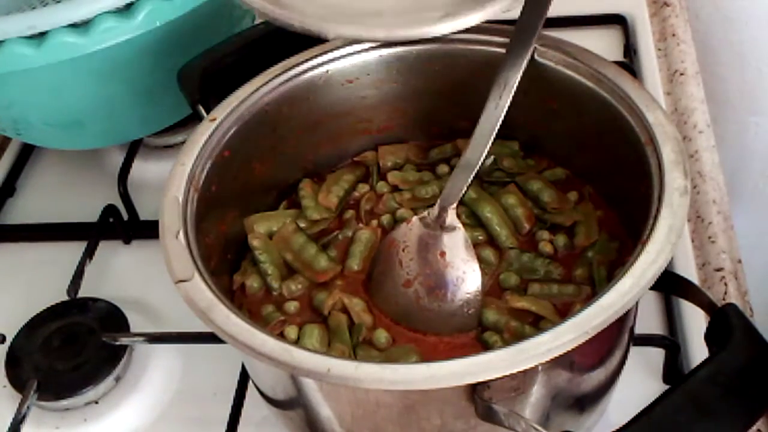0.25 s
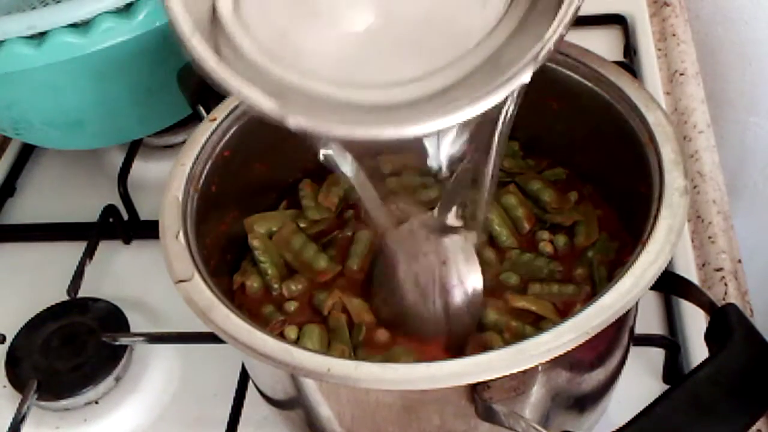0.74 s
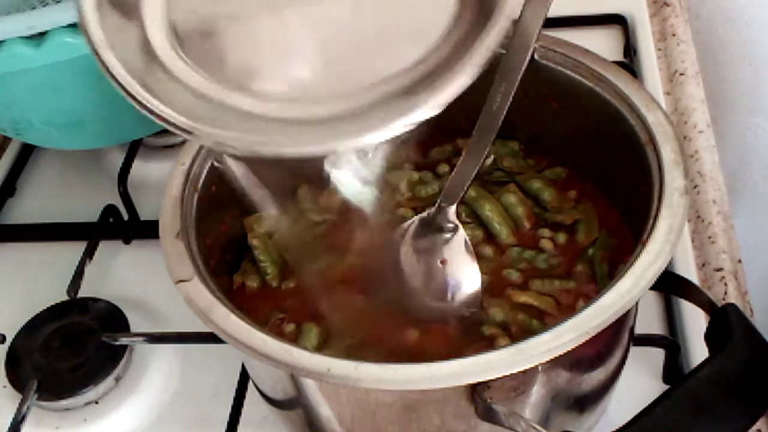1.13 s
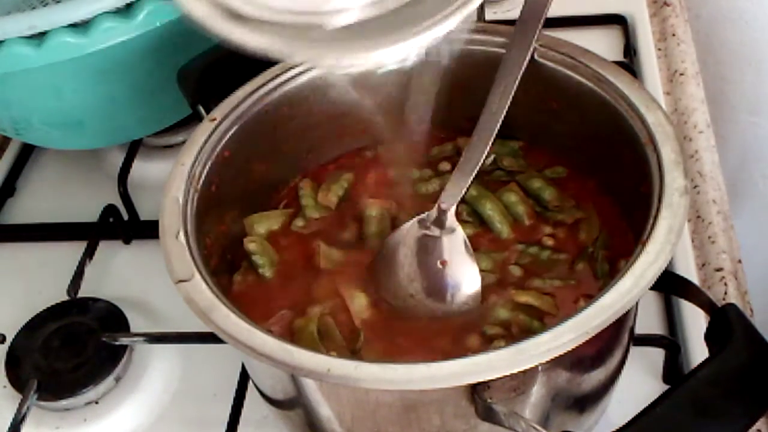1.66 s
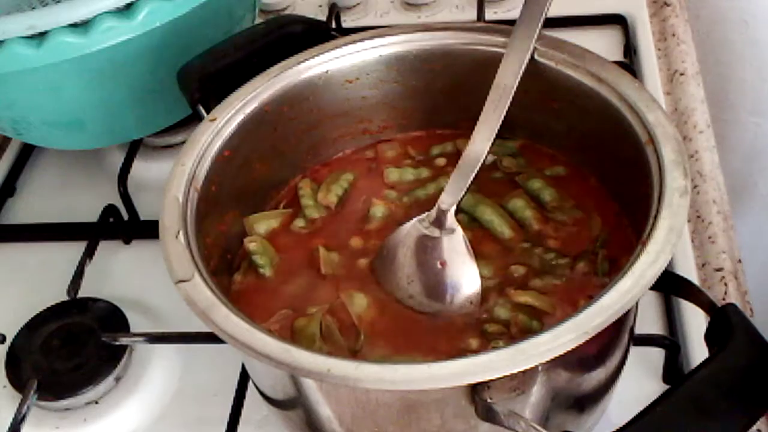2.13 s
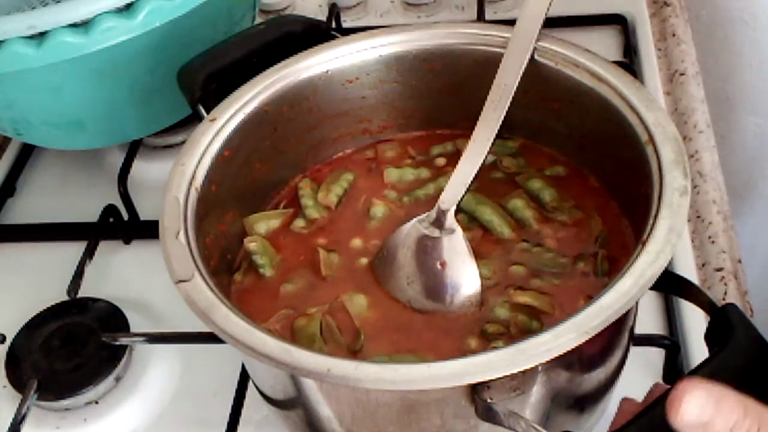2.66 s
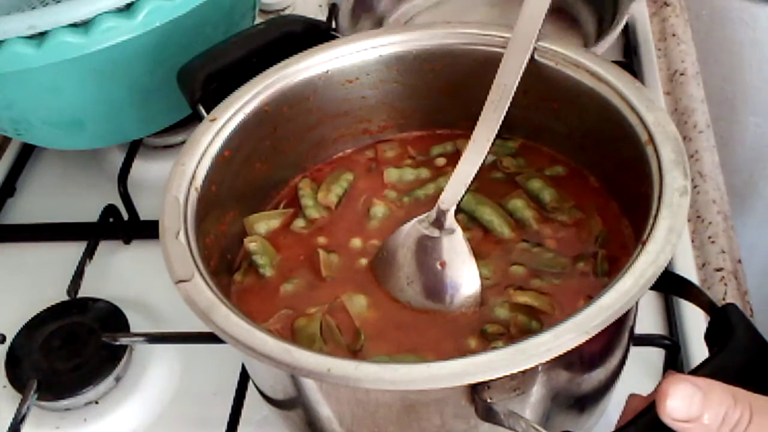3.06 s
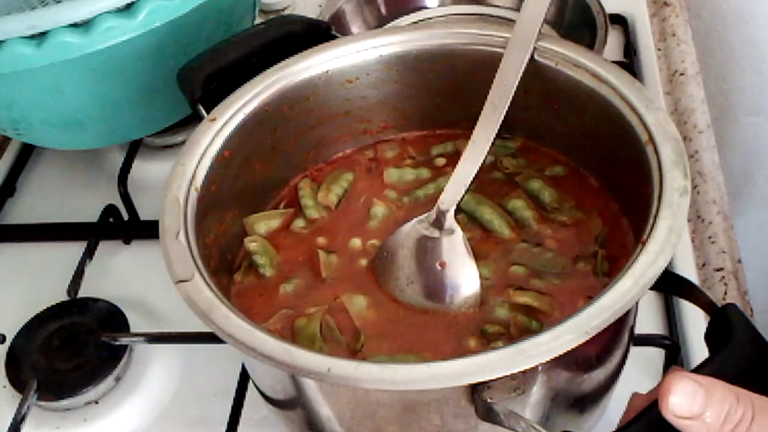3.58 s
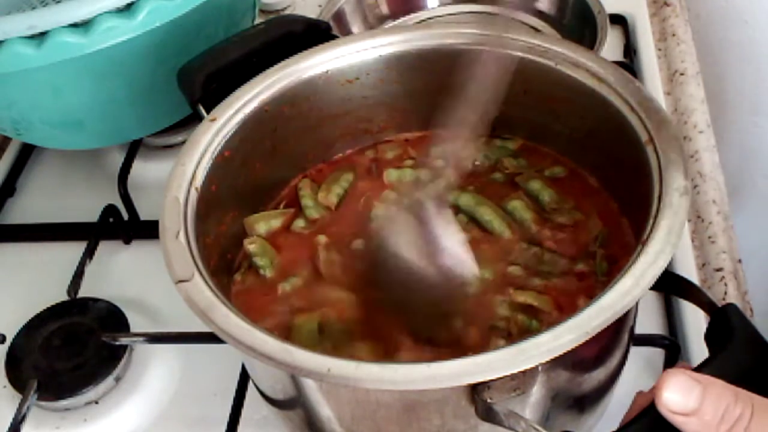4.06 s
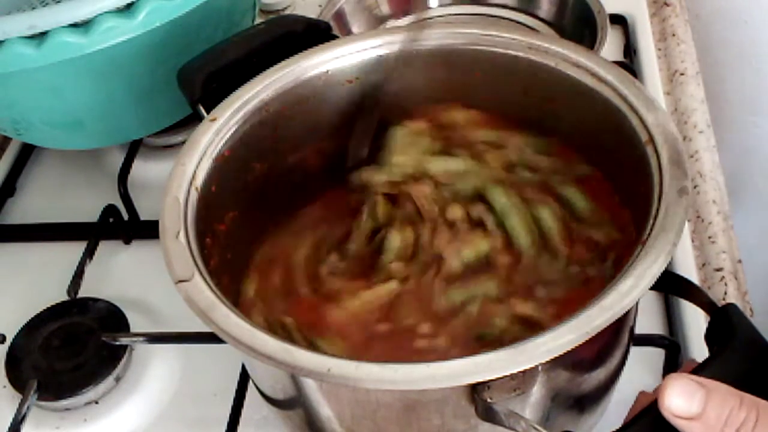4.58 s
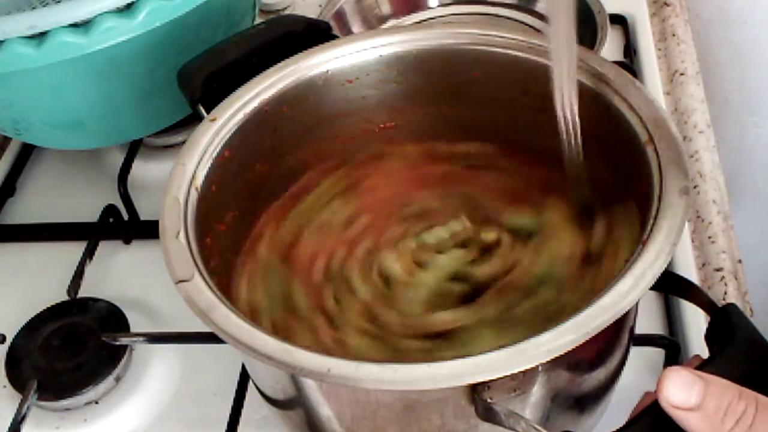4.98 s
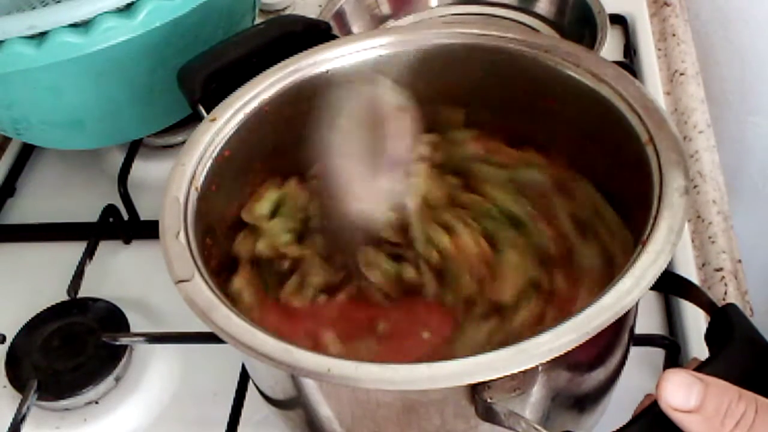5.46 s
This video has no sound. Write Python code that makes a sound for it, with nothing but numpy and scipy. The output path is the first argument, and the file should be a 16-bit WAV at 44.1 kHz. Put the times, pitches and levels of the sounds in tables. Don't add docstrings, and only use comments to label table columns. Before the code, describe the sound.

Close-up cooking sounds on a small, slightly thin microphone: a one-second splashy pour into thick stew, a few faint drips, a hard ringing bang of sheet steel on the stove, a gritty drag with rocking chinks, then one hard ladle knock and quick wet scraping swirls that fade. Steady burner and fan hum underneath, short room reflections.

```python
import sys
import numpy as np
from scipy import signal
from scipy.fft import rfft, irfft, next_fast_len
from scipy.io import wavfile
from scipy.ndimage import uniform_filter1d, map_coordinates

SR = 44100
rng = np.random.default_rng(int(sys.argv[2]) if len(sys.argv) > 2 else 0)


def wav_record(signal):
    frames = np.transpose(np.atleast_2d(signal))
    bounded = np.clip(frames, -1, 1)
    quanta = np.round(bounded * 32767).astype(np.int16)
    wavfile.write(sys.argv[1], SR, quanta)


def volts_from_db(level):
    exponent = np.asarray(level, float) / 20
    return 10 ** exponent


N = 251811
T = np.arange(N) / SR
F = np.maximum(np.fft.rfftfreq(next_fast_len(N), 1 / SR), 1)


def rms_one(x):
    return x / np.sqrt(np.mean(x ** 2) + 1e-20)


def in_time(rows):
    s, *columns = np.transpose(rows)
    return [np.interp(T, s, c, left=-150, right=-150) for c in columns]


def at_hz(points, hz, order=1):
    points = np.array(points)
    return np.interp(np.log(hz), np.log(points[:, 0]), points[:, order])


def colour(x, spectrum):
    size = next_fast_len(N)
    return rms_one(irfft(rfft(x, size) * volts_from_db(at_hz(spectrum, F)), size)[:N])


def drift(rate):
    steps = rng.standard_normal(600)
    coarse = map_coordinates(steps, [T[::32] * rate], order=3, mode="wrap")
    return np.interp(T, T[::32], coarse)


def grains(per_s, spread_db):
    sizes = volts_from_db(spread_db * np.minimum(rng.exponential(1, N), 3.5)) * rng.choice([-1, 1], N)
    return sizes * (rng.random(N) < per_s / SR)


def ring(clicks, hz, t60):
    r, w = volts_from_db(-60 / (t60 * SR)), 2 * np.pi * hz / SR
    return signal.lfilter([0, np.sin(w)], [1, -2 * r * np.cos(w), r * r], clicks + 1e-18)


def add(out, s, sound):
    i = round(s * SR)
    out[i:i + len(sound)] += sound[:N - i]


def soft_start(t, rise_s):
    return 1 - np.exp(-t / rise_s)


def resonance(x, hz, width_hz):
    r, w = np.exp(-np.pi * width_hz / SR), 2 * np.pi * hz / SR
    return signal.lfilter([1 - r * r, 0, r * r - 1], [2, -4 * r * np.cos(w), 2 * r * r], x)


def steep_resonance(x, hz, width_hz):
    return resonance(resonance(x, hz, width_hz), hz, width_hz)


def humps(x, peaks, patchy_db, rate):
    return rms_one(sum(volts_from_db(db + patchy_db * drift(rate)) * steep_resonance(x, hz, w) for hz, w, db in peaks))


def gliding(x, rows, width_hz):
    slow = signal.sosfilt(signal.butter(2, width_hz / 2, fs=SR, output="sos"), x)
    hz = np.interp(T, *np.transpose(rows))
    return rms_one(slow * np.sin(2 * np.pi * np.cumsum(hz) / SR))


def gestures(rows, rise_db_per_s, fall_db_per_s):
    t, out = T[::16], -150
    for s, length, start_db, end_db in rows:
        hold = np.interp(t, [s, s + length], [start_db, end_db])
        before = rise_db_per_s * np.maximum(s - t, 0)
        after = fall_db_per_s * np.maximum(t - s - length, 0)
        out = np.maximum(out, hold - before - after)
    return np.interp(T, t, out)


def strike(modes, level_db, cut_hz, spread_db):
    t, out = T[:SR * 3 // 4], 0
    luck = rng.normal(0, spread_db, len(modes))
    for (hz, db, t60), own in zip(modes, luck):
        gain = volts_from_db(level_db + db + own) / (1 + (hz / cut_hz) ** 4)
        out = out + gain * np.sin(2 * np.pi * hz * t) * volts_from_db(-60 * t / t60)
    return out


def bubbles(rows, t60_at, rise, tick_db, wobble=0.47):
    out, t = np.zeros(N), T[:SR // 5]
    ticks = rng.standard_normal((len(rows), len(t)))
    for (s, db, hz), tick in zip(rows, ticks):
        t60 = max(t60_at(hz), .004)
        octaves = rise * np.minimum(t / t60, 1) + wobble * uniform_filter1d(tick, size=90)
        phase = 2 * np.pi * np.cumsum(hz * 2 ** octaves) / SR
        fizz = steep_resonance(tick * np.exp(-t / .009), 1.1 * hz, .4 * hz)
        body = np.sin(phase) * volts_from_db(-60 * t / t60) + volts_from_db(tick_db) * fizz / np.max(np.abs(fizz))
        add(out, s, volts_from_db(db) * body * soft_start(t, 0.00082))
    return out


def kitchen(x, wet_db):
    t = T[:SR // 2]
    noise = signal.lfilter([.5], [1, -.5], rng.standard_normal(len(t)))
    tail = noise * volts_from_db(-60 * t / 0.38) * (t > .004)
    return x + volts_from_db(wet_db) * signal.fftconvolve(x, tail / np.sqrt(np.sum(tail ** 2)))[:N]


# time in seconds, level in dB.
ROAR_LEVEL = [(0, -88.5), (.7, -80), (.95, -71.5), (1.25, -75), (1.45, -79), (1.6, -94), (1.95, -71),
              (2.35, -81.5), (2.75, -81), (2.98, -71.5), (4.1, -87.5), (4.33, -78.5), (4.45, -91),
              (5.3, -72), (5.47, -70.5), (5.71, -86)]
# pitch in Hz, width in Hz, level in dB.
ROAR_PEAKS = [(569.6, 77, 0), (628, 60, 2), (682.4, 35, 0), (199, 42, -5)]


def roar():
    level_db, = in_time(ROAR_LEVEL)
    return volts_from_db(level_db) * humps(rng.standard_normal(N), ROAR_PEAKS, patchy_db=1.5, rate=7.2)


# pitch in Hz, level in dB per Hz.
HUM_COLOUR = [(25, 3.5), (50, -11.5), (120, -12), (300, -11.5), (700, -17), (1500, -17), (2200, -26),
              (5000, -29.5), (6500, -38.5), (10000, -30.5), (16000, -26)]
# pitch in Hz, width in Hz, level in dB.
HUM_PEAKS = [(106.8, 29, -2.5), (260.5, 13.5, -4), (316.8, 15.7, 5), (340.8, 22.5, 3), (593, 120, -10),
             (1281, 120, -3.5), (1510, 100, -4.5), (2346, 100, -28.5), (3230, 69, -14), (4200, 290, -14.5),
             (5336, 280, -18.5), (7170, 200, -27.5)]
# time in seconds, level in dB.
HUM_LEVEL = [(0, -62.5), (.7, -63), (1.1, -60), (1.5, -62.5), (2.5, -63), (3.0, -63), (4.0, -61),
             (4.3, -64), (5.0, -62.5), (5.3, -62), (5.71, -63.5)]


def hum():
    level_db, = in_time(HUM_LEVEL)
    wide = colour(rng.standard_normal(N), HUM_COLOUR)
    air = rng.standard_normal(N)
    steady = humps(air, HUM_PEAKS[:4], patchy_db=1, rate=3)
    restless = humps(air, HUM_PEAKS[4:], patchy_db=2, rate=4)
    motor = volts_from_db(2.6 * drift(2.7)) * np.sin(200 * np.pi * T)
    both = .5 * wide + 0.52 * (0.69 * steady + 0.59 * restless + 0.17 * motor)
    low = signal.sosfilt(signal.butter(1, 400, fs=SR, output="sos"), both)
    flame = roar()
    flutter = volts_from_db(-0.5 * drift(3.8)) - 1
    return flame + volts_from_db(level_db) * (both + flutter * low)


# start in seconds, peak level in dB, pitch in Hz.
GULPS = [
    (1, -44.5, 1200),
    (0.74, -56, 1440),
    (1.3, -44, 1270),
    (.96, -45, 1300),
    (1.4, -54, 870),
    (1.066, -44.5, 1540),
    (0.72, -63, 1000),
    (1.21, -43, 4330),
    (1.255, -43.5, 1760),
]


def gulps():
    return bubbles(GULPS, lambda hz: 0.011, rise=0.093, tick_db=-14)


# start in seconds, peak level in dB, pitch in Hz.
SPRAY_TICKS = [(0.7736, -49, 14300), (0.9123, -41, 12300), (0.9394, -59, 8450), (0.976, -55, 8400),
               (1.2017, -62, 8800), (1.3733, -55, 10400), (1.486, -59, 10400), (1.6801, -55, 9800),
               (1.748, -43, 8150), (1.8731, -53, 8800), (1.97, -53, 9900), (2.0144, -57, 13500),
               (2.153, -52, 13700), (5.2344, -53, 10140), (5.5797, -60, 13100), (1.479, -62, 8650),
               (1.533, -64, 12000), (1.594, -64, 11700), (1.815, -53, 8600), (1.911, -61, 10500),
               (1.933, -62, 13000), (1.766, -66, 10500), (1.86, -66, 9500)]


def spray_ticks():
    return bubbles(SPRAY_TICKS, lambda hz: 0.015, rise=0.094, tick_db=-5.5)


# start in seconds, peak level in dB, pitch in Hz.
DROPS = [(0.7761, -59, 6260), (0.7973, -45, 3080), (0.8584, -59.5, 5650), (0.9134, -47.5, 3390),
         (0.928, -46.5, 4420), (0.937, -57, 4450), (1.0066, -51.5, 2550), (1.072, -49, 2560),
         (1.1146, -56, 2470), (1.1568, -52, 5430), (1.1815, -48, 2700), (1.2077, -50.5, 2500),
         (1.2224, -51, 2650), (1.2514, -50, 3080), (1.2837, -56, 2530), (1.3844, -60, 3680),
         (1.4152, -61, 4200), (1.514, -58.5, 3300), (1.6444, -57, 3670), (1.6771, -53.5, 4670),
         (1.678, -55, 3700), (1.746, -59, 5400), (1.7544, -47, 5380), (1.8495, -55.5, 3730),
         (1.8687, -58, 1890), (1.91, -68, 1930), (.822, -65, 3270), (.836, -58, 3080), (.885, -58, 3420),
         (.913, -51, 5250), (.931, -51, 3630), (.932, -56, 6100), (1.011, -54.5, 3670), (1.058, -54, 4660),
         (1.075, -58, 6040), (1.09, -56, 2540), (1.16, -56, 6030), (1.215, -51, 2480), (1.237, -54, 2860),
         (1.222, -53, 4940), (1.305, -66, 6500), (1.288, -57, 1860), (1.418, -58, 5860), (1.42, -61, 3320),
         (1.385, -58, 5400), (1.692, -58, 3500), (1.765, -63, 6700), (1.852, -53, 5250), (1.87, -55, 5600),
         (1.908, -53, 5220)]


def drops():
    return bubbles(DROPS, lambda hz: 0.027, rise=0.11, tick_db=-9.5)


# time in seconds, splash level in dB, spray level in dB.
SURGES = [(.796, -76, -72), (.83, -70, -80), (.86, -78, -68), (1.02, -80.5, -82), (1.13, -68, -88),
          (1.25, -70, -75.5), (1.43, -68.5, -76), (0.917, -68, -62), (1.079, -67.5, -76),
          (1.188, -62.5, -73), (1.378, -65, -64), (1.5, -68.5, -75), (1.548, -84, -72), (1.66, -69, -81),
          (1.69, -75, -68), (1.756, -77, -64), (1.81, -68, -65), (1.887, -59, -68.5), (1.966, -90, -78)]
# pitch in Hz, level in dB per Hz.
SPLASH_COLOUR = [(300, -19), (1200, 3), (2600, 1.5), (5000, 11), (7000, 1), (9000, -10), (16000, -58)]


def pour():
    stream_end_s, stop_db_per_s, bubbles_per_s = 1.86, 300, 2900
    splash_db = gestures([(s, 0, db, db) for s, db, _ in SURGES], rise_db_per_s=597, fall_db_per_s=113)
    splash_db -= stop_db_per_s * np.maximum(T - stream_end_s, 0)
    spray_db = gestures([(s, 0, db, db) for s, _, db in SURGES], rise_db_per_s=597, fall_db_per_s=190)

    born = grains(bubbles_per_s * volts_from_db(2.0 * drift(40)), spread_db=3.5)
    dealt = rng.integers(0, 30, N)
    rings = np.zeros(N)
    for k, hz in enumerate(np.geomspace(1100, 7500, 30)):
        rings += volts_from_db(2.5 * drift(16)) * ring(born * (dealt == k), hz, 55.0 / hz) * np.sqrt(hz)
    hiss = rng.standard_normal(N) * volts_from_db(2.2 * drift(25.0))
    splash = colour(rms_one(rings) + 0.31 * hiss, SPLASH_COLOUR)

    ticks = grains(900 * volts_from_db(7.4 * drift(60)), spread_db=-1.0)
    spray = np.zeros(N)
    for k, hz in enumerate(np.geomspace(7500, 15500, 6)):
        spray += resonance(ticks * (dealt // 5 == k), hz, 0.13 * hz)
    spray = colour(spray, [(5000, -29), (8000, 6), (11000, 7), (16000, 15)])
    return volts_from_db(splash_db) * splash + volts_from_db(spray_db + 1) * spray


# start in seconds, length in seconds, level in dB,
# pitch in Hz.
CATCHES = [(4.61, 0.042, -61.5, 11500), (4.612, 0.017, -61, 5600), (4.665, .025, -60, 8100),
           (4.69, .015, -68, 9300), (4.745, 0.014, -58, 4300), (4.78, 0.011, -61, 7400),
           (4.793, 0.0065, -64, 12000), (4.913, .03, -61, 7450), (4.918, 0.018, -65, 9700),
           (4.94, .008, -53, 4350), (4.965, 0.017, -57, 5540), (5.0, 0.0088, -56, 5400),
           (6.2, 0.017, -69, 9700), (5.07, .01, -72, 10500), (5.088, .01, -64.5, 6540),
           (5.1, .014, -68, 13000), (5.228, 0.008, -68, 14000), (5.228, 0.0065, -60, 18300),
           (5.237, 0.0049, -74, 6100), (5.296, .01, -70, 11400), (5.296, 0.011, -65, 15000),
           (5.642, .006, -71, 14000), (5.64, 0.087, -79, 4630), (5.466, 0.0071, -75, 5200),
           (2.303, 0.036, -72, 3215), (1.865, 0.088, -65, 1400), (0.92, .03, -60, 2580),
           (1.01, 0.019, -71, 2800), (1.3, 0.033, -68, 2800), (1.068, 0.024, -71, 6300),
           (1.2, .035, -71, 3750), (0.9, 0.015, -70.5, 5800), (0.93, 0.017, -64, 4800),
           (1.31, .015, -72.5, 6450), (1.38, 0.015, -78, 4900), (1.42, .012, -69.5, 6900)]


def catches():
    out, t = np.zeros(N), T[:SR // 5]
    for (s, length, db, hz), noise in zip(CATCHES, rng.standard_normal((len(CATCHES), len(t)))):
        if 2000 < hz < 4000:
            breadth = .45
        else:
            breadth = 3.5 if hz < 2000 or hz > 10500 else 1
        burst = rms_one(steep_resonance(noise, hz, .07 * hz * breadth))
        fall = np.exp(-np.maximum(t - length, 0) / 0.0034)
        add(out, s, volts_from_db(db) * burst * soft_start(t, 0.0012) * fall)
    return out


# start in seconds, peak level in dB, pitch in Hz.
DRIPS = [
    (2.32, -74, 3170),
    (2.36, -73, 3330),
    (3.116, -63, 6600),
    (3.94, -58.5, 2670),
    (3.958, -75, 8450),
]


def drips():
    return bubbles(DRIPS, lambda hz: 290 / hz, rise=0.011, tick_db=-14.5, wobble=.08)


# pitch in Hz, level in dB per Hz, seconds to fall 60 dB.
CLANG = [(41.14, -1, 0.73), (97, 6, 0.32), (256, -10, 1), (610, -2.5, 0.51), (1240, -8, 0.58),
         (2310, -8.5, 0.55), (3500, -10.5, 0.42), (5600, -16, 0.26), (7340, -14.5, 0.15),
         (12000, -17, 0.093), (16220, -22, 0.22)]


def dense_modes(t60_share, rise_s, low_hz, count):
    t = T[:int(SR * min(t60_share * 1.3, .75))]
    luck = rng.random((count, 4))
    place = (np.arange(count)[:, None] + luck[:, :1]) / count
    hz = (50 ** .5 + place * (16000 ** .5 - 50 ** .5)) ** 2
    t60 = t60_share * at_hz(CLANG, hz, order=2) * (0.8 + 0.56 * luck[:, 1:2])
    gain = volts_from_db(at_hz(CLANG, hz) - 8.7 * luck[:, 2:3]) * hz ** 0.44 / (1 + (low_hz / hz) ** 2)
    out = np.zeros(len(t))
    for f, g, d, turn in np.c_[hz, gain, t60, luck[:, 3]]:
        r, w, start = volts_from_db(-60 / (d * SR)), 2 * np.pi * f / SR, 2 * np.pi * turn
        click = t[:int(d * SR)] == 0
        sine_top = [np.sin(start), r * np.sin(w - start)]
        mode = signal.lfilter(sine_top, [1, -2 * r * np.cos(w), r * r], click)
        add(out[:len(click)], 0, g * mode)
    return out * soft_start(t, rise_s) / np.max(np.abs(out))


BOWL_HZ = [100, 189, 244, 311, 345, 425, 581, 851, 945, 1604, 1701, 1966, 2138, 2286, 2503, 2676, 2756,
           2881, 3270, 3428, 3572, 3704, 3755, 3844, 4156, 4242, 4511, 4646, 6035, 7343]
# level in dB, seconds to fall 60 dB.
BOWL_RING = [(-23.5, 0.7), (-18, 0.49), (-21.5, 0.54), (-46, 0.12), (-16, 0.41), (-20, 0.95), (-14, 0.43),
             (-17.5, 0.33), (-7, 0.093), (-12.5, 0.14), (-25.5, 0.33), (-15, 0.38), (-17, 0.362),
             (-10, 0.47), (-32.5, 0.24), (-20, 0.32), (-21, 0.57), (-9, 0.3), (-4, 0.098), (-5.5, 0.21),
             (-14.5, 0.24), (-40, 0.18), (-17, 0.14), (-11, 0.25), (-24.5, 0.18), (-39, 0.26), (-14, 0.25),
             (-29.5, 0.32), (-43, .15), (-16, 0.206)]


def bowl_down():
    rings, crash, down_s = np.zeros(N), np.zeros(N), 3.1258
    blow = strike(np.c_[BOWL_HZ, BOWL_RING], -24, 20000, spread_db=0)
    add(rings, down_s, blow * soft_start(T[:len(blow)], .001))
    add(crash, down_s, volts_from_db(-18.5) * dense_modes(0.77, 0.00073, 59, count=520))
    return rings, crash


# time in seconds, level in dB.
SLIDE = [
    [(3.33, -49.5), (3.39, -54), (3.432, -48), (3.548, -68)],
    [(3.556, -50), (3.575, -37), (3.61, -41.5), (3.766, -47), (3.89, -57.5), (3.954, -56.5), (4.07, -82),
     (4.15, -80)],
]
# pitch in Hz, level in dB, seconds to fall 60 dB.
BOWL_RIM = [(187.6, -25, 0.9), (316, -7, 0.1), (869, -0.5, 0.075), (943, -1, 0.19), (1487, -2.5, 0.083),
            (2260, -10, 0.14), (1613, -5, 0.14), (1630, -27, 0.26), (3320, -25, 0.18), (3930, -28, 0.32),
            (6170, -17, .14), (5260, -25, .2), (2293, -0.5, 0.12), (2520, -20, 0.57), (2880, -2.5, 0.062),
            (3080, -16, 0.64), (3223, -19, 1), (3670, -3, 0.087), (3800, -22, 0.13), (4720, -7, 0.08),
            (5600, -25, 0.069), (5430, 1, 0.19), (5370, -1, 0.27), (6950, -29, .15), (7500, -18, 0.14),
            (8650, -9, .1)]
# pitch in Hz, level in dB per Hz.
SLIDE_COLOUR = [(60, 16.5), (300, 12.5), (1000, -1), (3000, 4), (5000, -14), (8000, -45), (16000, -61)]
# pitch in Hz, level in dB per Hz.
GRIT_COLOUR = [(1000, -56.5), (4000, 2), (6000, 3.5), (9000, 1), (16000, -7)]


def bowl_slide():
    rub = grains(5000 * volts_from_db(5.5 * drift(30)), spread_db=4.0)
    rim = [(hz, 20 / t60, db) for hz, db, t60 in BOWL_RIM if 250 < hz < 4500]
    sung = humps(rub, rim, patchy_db=4, rate=25)
    patches = [(hz, 110, 0) for hz in rng.uniform(600, 9000, 50)]
    wall = 1.3 * rms_one(rub) + humps(rub, patches, patchy_db=3, rate=30)
    drag, grit = colour(wall, SLIDE_COLOUR), colour(wall, GRIT_COLOUR)
    out = np.zeros(N)
    for move, lower_db, singing in zip(SLIDE, (-11, -3), (.9, .3)):
        rumble_db, = in_time(move)
        grit_db = -54.5 + 2.13 * (rumble_db + 42.5)
        out += volts_from_db(rumble_db + lower_db) * (singing * sung + 0.77 * drag) + volts_from_db(grit_db) * grit
    return out


# start in seconds, level in dB, hardness as a cut-off in Hz.
ROCKS = [
    (3.5625, -38.5, 12000),
    (3.585, -47, 2930),
    (3.612, -44.5, 3500),
    (3.643, -47.5, 2600),
    (3.69, -49.5, 3440),
    (3.728, -50, 3060),
    (3.764, -52.5, 2930),
    (3.795, -51.5, 2970),
    (3.845, -61, 1850),
    (3.955, -74, 3090),
]


def bowl_rocks():
    rings, crash = np.zeros(N), np.zeros(N)
    add(crash, ROCKS[0][0], volts_from_db(-26.5) * dense_modes(0.45, 0.00093, 650, count=160))
    tick = dense_modes(0.024, 0.00084, 700, count=60)
    for s, db, cut_hz in ROCKS:
        add(rings, s, strike(BOWL_RIM, db, cut_hz, spread_db=1.5))
        add(crash, s, volts_from_db(db) * tick)
    return rings, crash


def bowl():
    down_rings, down_crash = bowl_down()
    rock_rings, rock_crash = bowl_rocks()
    rings = down_rings + rock_rings
    crash = down_crash + rock_crash + bowl_slide()
    return rings + kitchen(crash + 0.18 * rings, wet_db=-9.0)


# start in seconds, peak level in dB, pitch in Hz,
# seconds to fall 60 dB.
CHINKS = [(3.5635, -43, 2228, 0.46), (3.5635, -42.5, 2275, 0.59), (3.5627, -41, 5393, 0.27),
          (3.568, -45, 6350, .08), (3.643, -47, 928, .06), (3.649, -48, 3300, 0.12),
          (3.689, -42, 970, 0.053), (3.69, -43.5, 2865, 0.087), (3.692, -48, 3760, 0.14),
          (3.692, -50, 7000, 0.051), (3.728, -42, 945, 0.027), (3.728, -58, 7040, 0.11),
          (3.744, -42, 2875, .05), (3.764, -49, 910, 0.044), (3.778, -46.5, 3200, 0.054),
          (3.793, -46, 3060, 0.053), (3.797, -53, 885, 0.041), (3.824, -47, 890, 0.036),
          (3.831, -66, 2950, 0.06), (3.85, -53, 1063, 0.15), (3.421, -68, 3800, 0.078),
          (3.425, -67, 5250, .12)]


def chinks():
    out, t = np.zeros(N), T[:SR // 2]
    for s, db, hz, t60 in CHINKS:
        add(out, s, volts_from_db(db - 60 * t / t60) * np.sin(2 * np.pi * hz * t) * soft_start(t, 0.00092))
    return out


# start in seconds, level in dB.
KNOCKS = [
    (1.8925, -45.5),
    (4.541, -24),
    (5.3005, -44),
]
# pitch in Hz, seconds to fall 60 dB,
# then a level in dB for each of the three knocks.
KNOCK_MODES = [(772, 0.027, -8, -3.5, 1.5), (1380, 0.016, 18, 7, 7), (1794, 0.016, 7, 7.5, 11.5),
               (2206, 0.052, -26, -14, -5), (2410, 0.0093, -31, -9, 11), (2820, 0.022, -29, 1, 0),
               (2930, 0.051, -20, -35, -2.5), (3430, 0.017, 9, 1.5, -26), (3800, 0.042, -3, -25, -5),
               (4450, 0.028, -36, -10, -0.5), (4940, 0.054, -14, -9.5, -9), (5370, 0.022, -1, -8, -5),
               (6670, 0.0087, 6, -34, -38), (9500, 0.014, -24, -27, -11)]


def ladle_knocks():
    out, crack = np.zeros(N), dense_modes(0.072, 0.0008, 330, count=120)
    for k, (s, db) in enumerate(KNOCKS):
        modes = np.array(KNOCK_MODES)[:, [0, 2 + k, 1]]
        blow = strike(modes, db - 6, 20000, spread_db=0)
        add(out, s, blow * soft_start(T[:len(blow)], .0006))
        add(out, s, volts_from_db(db + 1.5) * crack)
    return out


BITE_DB_PER_S, LIFT_DB_PER_S = 5000, 902
# start in seconds, length in seconds, start dB, end dB.
SQUEAKS = [
    (4.543, 0.027, -48, -71),
    (4.604, 0.057, -51, -55),
    (4.719, 0.138, -57, -52),
    (4.906, 0.16, -50.5, -60.5),
]
# time in seconds, pitch in Hz.
SQUEAK_HZ = [(4.6, 2753), (4.85, 2734), (4.939, 2742), (5.0, 2540), (5.019, 3010), (5.084, 3590),
             (5.2, 3670)]


def ladle_squeak():
    level_db = gestures(SQUEAKS, BITE_DB_PER_S, LIFT_DB_PER_S)
    return volts_from_db(level_db) * 0.68 * gliding(rng.standard_normal(N), SQUEAK_HZ, width_hz=230)


# start in seconds, length in seconds, start dB, end dB.
SLOSHES = [
    (4.547, 0.056, -51, -55.5),
    (4.62, 0.23, -52, -72.5),
    (5.02, 0.094, -66, -60.5),
    (5.09, 0.036, -70, -56.5),
    (5.3, 0.14, -92, -72),
]
# pitch in Hz, level in dB per Hz.
SLOSH_COLOUR = [(60, -11), (200, -3), (400, -8), (900, -0.5), (1600, -6.5), (3000, -11), (16000, -76)]


def slosh():
    stew = colour(grains(1500 * volts_from_db(5.1 * drift(30)), spread_db=2.0), SLOSH_COLOUR)
    return volts_from_db(gestures(SLOSHES, rise_db_per_s=4000, fall_db_per_s=208)) * stew


# start in seconds, length in seconds, start dB, end dB.
STROKES = [(4.56, 0.027, -63, -57), (4.611, 0.11, -51, -55), (4.725, 0.077, -54.5, -53),
           (4.795, 0.042, -51, -51.5), (4.855, 0.078, -65, -65), (4.911, 0.089, -53, -55),
           (5.01, 0.096, -57, -59.5), (5.235, 0.021, -66, -73), (5.32, 0.095, -69, -76.5),
           (5.46, 0.13, -71, -82.5), (5.63, .08, -76, -83)]
POT_HZ = [1160, 1780, 2100, 2450, 3050, 3280, 3630, 3900, 4170, 4470, 4770, 5200, 5520, 5800, 6100, 6460,
          6750, 7250]
# time in seconds, pitch in Hz.
RUB_HZ = [(4.6, 5150), (4.659, 4200), (4.75, 4500), (4.801, 4200), (4.9, 4330), (4.98, 5380), (5.03, 4210),
          (5.088, 3600), (5.199, 3270)]
# pitch in Hz, level in dB per Hz.
SCRAPE_COLOUR = [(300, -56), (1000, 2), (2500, -1.5), (5000, -4), (7000, -9.5), (9000, -8.5),
                 (12000, -18.5), (16000, -15)]


def ladle_scrape():
    rub = grains(9000 * volts_from_db(2.0 * drift(40)), spread_db=4.0)
    bottom = humps(rub, [(hz, 110, 0) for hz in POT_HZ], patchy_db=3.5, rate=45)
    broad = humps(rub, [(hz, 0.36 * hz, 0) for hz in np.geomspace(700, 15000, 12)], patchy_db=2, rate=25)
    fine = humps(rub, [(hz, 130, 0) for hz in rng.uniform(3000, 15500, 45)], patchy_db=5, rate=30)
    patches = .85 * broad + .45 * fine
    wet = gliding(rub, RUB_HZ, width_hz=2700)
    scrape = colour(0.96 * patches + 0.32 * bottom + .5 * wet, SCRAPE_COLOUR)
    return volts_from_db(gestures(STROKES, BITE_DB_PER_S, LIFT_DB_PER_S)) * scrape


# start in seconds, peak level in dB, pitch in Hz.
SLOPS = [(4.56, -56, 1540), (4.578, -39, 1194), (4.635, -39.5, 800), (5.074, -34, 3570),
         (5.096, -43.5, 703), (5.108, -38, 747), (5.138, -45, 1810), (5.148, -43, 1790),
         (5.235, -49.5, 4940), (5.412, -48, 2710), (5.465, -56, 4720)]


def slops():
    return bubbles(SLOPS, lambda hz: 0.0062 + 38 / hz / 2, rise=0.029, tick_db=-13.0)


def scene():
    water = pour() + drops() + spray_ticks() + slops() + drips()
    ladle = ladle_knocks() + ladle_scrape() + slosh() + ladle_squeak()
    steady = bowl() + hum()
    water += gulps()
    return (kitchen(water + ladle, wet_db=-9.5) + steady + kitchen(chinks() + catches(), wet_db=-8))[None]


def low_pass(x):
    return signal.sosfilt(signal.butter(12, 16820, fs=SR, output="sos"), x)


def record(dry):
    low_hz, top_hz = 72, 15850
    step_hz, step_db = 7410, -10.5
    peak_hz, peak_width_hz, peak_db = 15220, 2000, 15
    x = signal.sosfilt(signal.butter(3, low_hz, "high", fs=SR, output="sos"), dry)
    step = volts_from_db(step_db / (1 + (step_hz / F) ** 20))
    peak = np.sqrt(1 + volts_from_db(peak_db) ** 2 / (1 + (2 * (F - peak_hz) / peak_width_hz) ** 2) ** 4)
    x = irfft(rfft(x, next_fast_len(N)) * step * peak, next_fast_len(N))[:, :N]
    x = signal.sosfilt(signal.ellip(8, 1, 40, top_hz, fs=SR, output="sos"), x)
    return low_pass(x)


dry = scene()
out = record(dry)
wav_record(out)
```